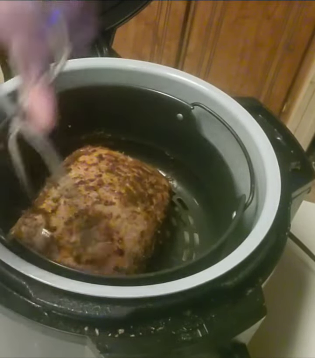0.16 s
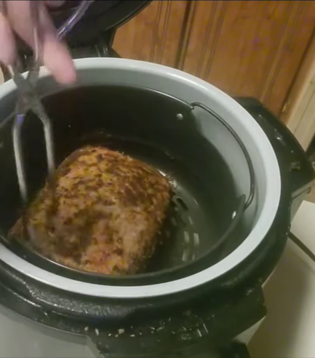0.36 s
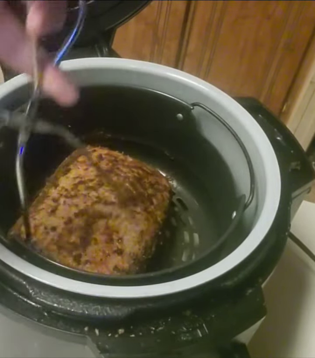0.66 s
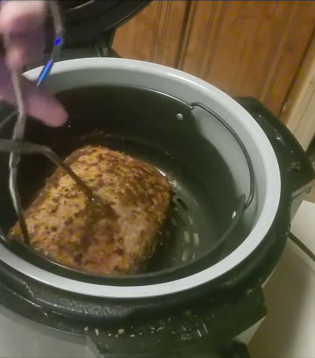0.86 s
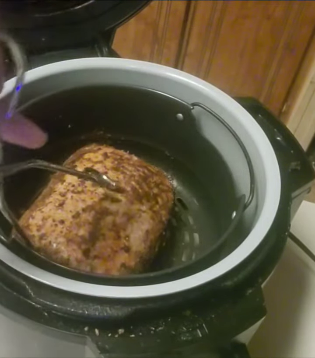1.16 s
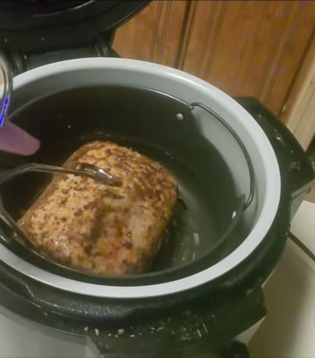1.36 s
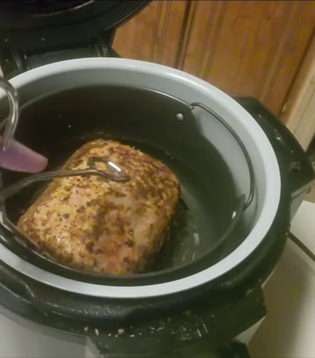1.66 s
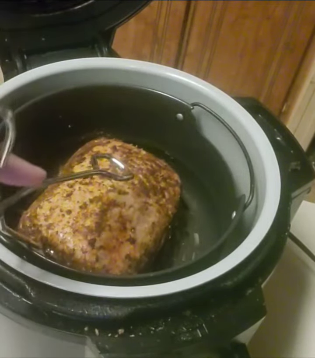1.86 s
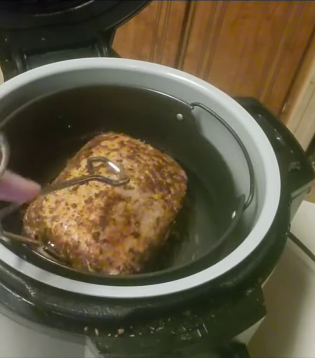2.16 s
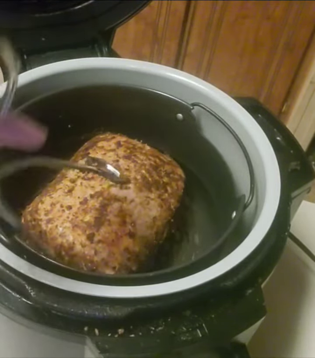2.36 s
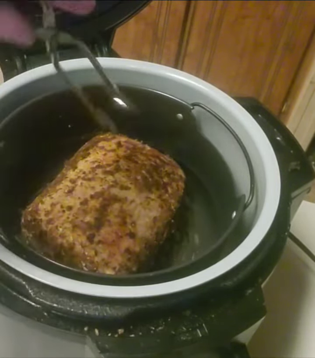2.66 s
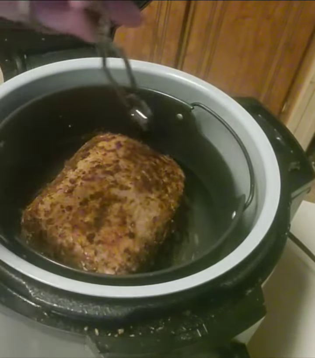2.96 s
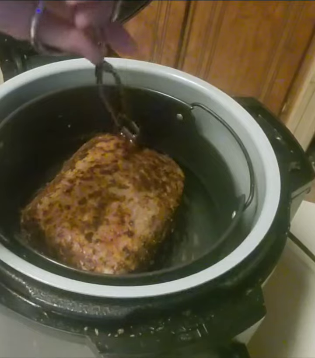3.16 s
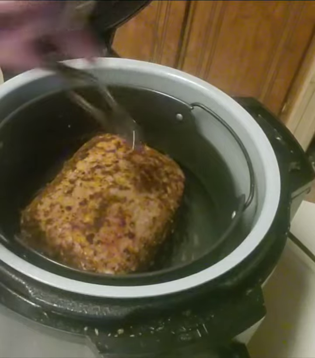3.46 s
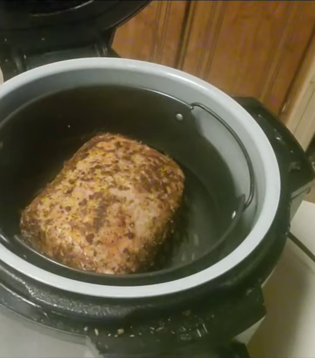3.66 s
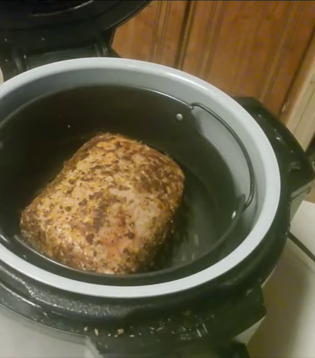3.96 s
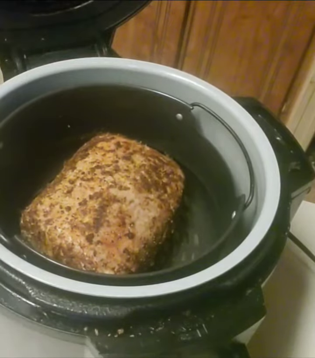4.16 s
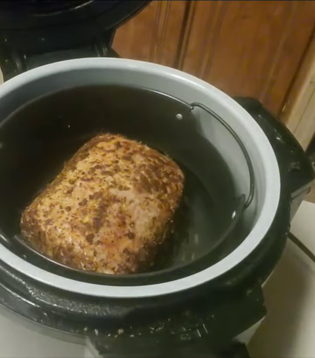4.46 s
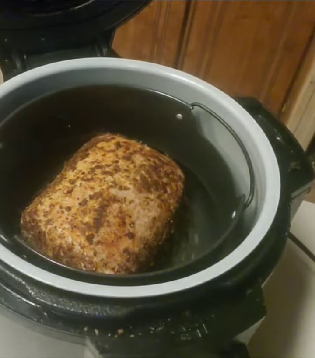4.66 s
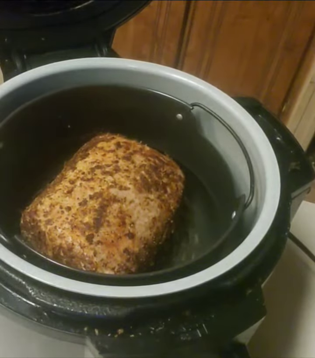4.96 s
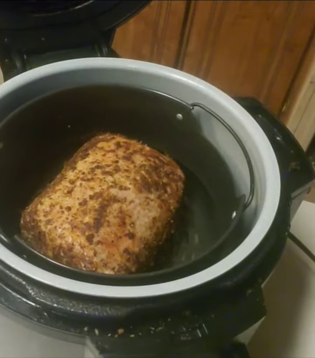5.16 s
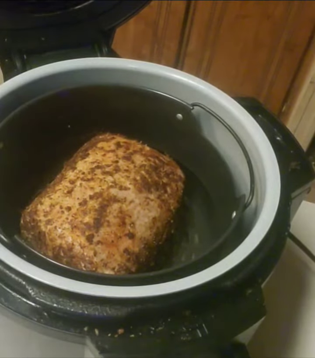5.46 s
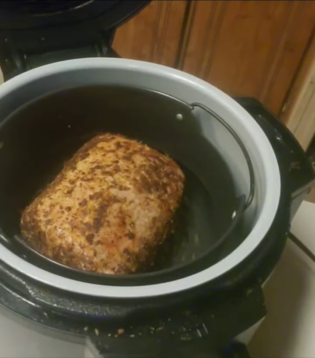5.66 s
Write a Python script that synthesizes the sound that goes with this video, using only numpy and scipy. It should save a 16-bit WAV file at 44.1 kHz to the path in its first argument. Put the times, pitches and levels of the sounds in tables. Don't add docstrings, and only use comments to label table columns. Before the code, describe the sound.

Steel tongs scrape, rattle and clink on a cooking basket over a low fan hum, then thud and clatter down on a counter.

```python
import sys
import numpy as np
from scipy import signal
from scipy.fft import rfft, irfft
from scipy.io import wavfile
from scipy.ndimage import uniform_filter1d

SR = 44100
rng = np.random.default_rng(int(sys.argv[2]) if len(sys.argv) > 2 else 0)


def invert_db(level):
    return 10 ** (np.asarray(level, dtype=float) / 20)


def store_pcm(level_fs):
    pcm = np.round(np.clip(level_fs, -1, 1) * 32767).astype(np.int16)
    wavfile.write(sys.argv[1], SR, np.atleast_2d(pcm).T)


N = 256662

# [t/s, peak level/dB, chatter length/ms, ring level/dB]
RIM_TAP_HITS = [
    (.074, -42.5, 16, -13),
    (.971, -48.5, 12, 0),
    (1.078, -39, 8, -23),
    (1.478, -57, 6.5, -15),
]
RATTLE_HITS = [(.4754, -46, 3, -8), (.5035, -40, 2, -8.5), (.5078, -27.5, 2, -8), (.5098, -25.5, 2, -8),
               (.5125, -30, 2, -9), (.5155, -31.5, 2, -8), (.5188, -29.5, 2, -5.5), (.5235, -30.5, 2, -7),
               (.5275, -30, 3.5, -7.5), (.533, -33.5, 2, -10), (.538, -32, 2, -9.5), (.547, -34, 3, -8),
               (.5535, -34, 2, -8), (.562, -36, 3, -9), (2.6505, -41, 5, -8.5), (2.6645, -36, 7, -9.5)]
RIM_CLINK_HITS = [
    (.6658, -17.5, 2.6, -28.5),
    (.6675, -7, 3.7, -13),
    (.696, -26, 5.5, -8.5),
    (.7035, -29, 5.4, -12),
]
WALL_TAP_HITS = [
    (1.194, -32.5, 6.6, 5.3),
    (1.2125, -47, 4.1, 4.4),
]
WALL_CLINK_HITS = [
    (2.686, -16, 6.35, -4.5),
]
THUD_HITS = [
    (4.4664, -14, 0.1, -1),
    (4.63, -45, 5.5, 3),
]
TIP_HITS = [
    (4.874, -27, 3, -7),
]
LAID_HITS = [
    (4.9729, -4.5, 1.3, -19.5),
    (4.9745, -5, 4, -12.5),
]
BOUNCE_HITS = [
    (4.9895, -18.5, 4.1, -16),
    (4.9928, -13, 8.6, -14),
    (5.0085, -26, 3, -11),
    (5.014, -20.5, 3.5, -14.5),
    (5.0225, -23.5, 9.8, -11),
    (5.0435, -27.5, 5.7, -10),
    (5.059, -24.5, 6.1, -13),
]
# [t/s, peak
# level/dB, left-right level/dB]
FAINT_TICKS = [(1.5595, -60, 7), (1.5791, -60, 2.5), (1.6887, -60, 4), (2.3046, -51.5, 8), (3.685, -57, -5),
               (4.0327, -62, -13), (4.1994, -59, -6), (4.4657, -42.5, -5), (5.5394, -77, -4.5),
               (5.5898, -74, -2.5)]

# [f/Hz, density level/dB per Hz]
RIM_TAP_COLOUR = [(180, -22), (300, -6), (701, -26), (870, -11), (1460, -11.5), (1690, -15.5), (2320, 1),
                  (2610, -15), (3290, 5.5), (4590, -15), (4990, -12), (12300, -14), (16000, -42)]
RATTLING_COLOUR = [(300, -26), (1200, -23.5), (2200, -11), (2700, -12), (3300, 2), (4100, -4.5),
                   (5000, -14), (6100, -7.5), (7500, -12), (12000, -19), (16000, -30.5)]
RIM_CLINK_COLOUR = [(70, -38), (150, -19), (340, -18.5), (700, -31), (1800, -12), (2600, -10), (3300, -1),
                    (4200, -9.5), (5300, -17.5), (6100, -4.5), (7500, -8.5), (8600, -19), (10400, -6),
                    (13000, -24.5), (14500, -44)]
LOW_WALL_COLOUR = [(290, -27), (500, -4), (613, -31), (893, -13), (1720, -21.5), (2070, -8), (2650, -40),
                   (3200, -13), (3810, -13), (11300, -32), (14700, -55), (16000, -71)]
WALL_CLINK_COLOUR = [(60, -35), (160, 2), (350, -8.5), (600, -26), (1800, -33.5), (2700, -18), (3500, -8),
                     (4400, -10.5), (5200, -23), (6100, -10.5), (8000, -17), (11600, -12.5), (13800, -23),
                     (15800, -43)]
COUNTER_COLOUR = [(35, -46.5), (70, -13), (175, -19), (300, 3.5), (470, -1), (700, -7.5), (1000, -9.5),
                  (2000, -7), (2800, -15), (3500, -18), (4300, -15), (6000, -18), (10000, -46),
                  (15800, -49)]
TIP_TOUCH_COLOUR = [(240, -33), (400, 2), (839, -18), (1040, -5), (1820, -10), (2510, -4.5), (2970, -9.5),
                    (5430, -19.5), (6640, -34), (8240, -32), (16000, -55)]
LANDING_COLOUR = [(60, -65), (120, -17.5), (550, -16), (1100, -4), (1700, 2), (2250, -2.5), (2700, -2),
                  (4000, -13), (5300, -14.5), (6200, -14), (7300, -23.5), (8800, -16), (11300, -35),
                  (15800, -31)]
BOUNCING_COLOUR = [(35, -24), (60, -2), (112, -3.5), (291, -10), (394, 1.5), (1020, -3.5), (1520, -14),
                   (1790, -3.5), (2710, -1), (6120, -14.5), (7540, -34), (11700, -27.5), (15500, -43)]
FAINT_TICK_COLOUR = [(2000, -24), (5000, 4), (9000, 10.5), (13000, 9), (16000, 1.5)]

# [f/Hz, level/dB, t60/s]
RIM_MODES = [(934, -6, 0.26), (1343, -7.5, .2), (2440, -5.5, 0.22), (3144, 0, .08), (2990, -1.5, 0.12),
             (3960, -8, .12), (4060, -9, .12), (5900, -10.5, .12), (5950, -9, 0.16), (6380, -2, 0.13),
             (7550, -23.5, .2), (9700, -18, 0.074), (10300, -11, 0.046)]
RATTLE_MODES = [(2200, -6, .04), (3300, 2.5, .04), (3330, -4, .05), (4280, -5, 0.069), (6100, -12.5, .03)]
STRUCK_RIM_MODES = [(333, -3, 0.19), (906, -11.5, .18), (1365, -11.5, .25), (2390, -10, 0.22),
                    (3220, 0.5, 0.075), (3338, -8, .14), (3517, -5, .06), (4264, -6, .1), (4888, -9, .09),
                    (5926, -4, .05), (6148, -15, .2), (6590, -3.5, 0.1), (7553, -15.5, .15),
                    (9860, -7, .06)]
LOW_WALL_MODES = [(294, -15, 0.087), (860, -12, 0.041), (1390, -14, 0.045), (2067, 0, 0.045),
                  (2346, -16, 0.089), (3217, 4.5, 0.028), (3600, -22, 0.08), (4800, -21, 0.04)]
WALL_MODES = [(168, -4.5, 0.17), (365.6, -6, 0.22), (924, -20.5, 0.45), (1410, -25, 0.21),
              (1870, -23, 0.26), (2400, -14, .12), (2750, -10, 0.15), (3037, -10, 0.22), (3374, -1, 0.092),
              (3640, 0.5, 0.075), (4250, -5, 0.088), (4840, -5.5, 0.085), (6050, -1.5, 0.052),
              (6557, 0, 0.054)]
COUNTER_MODES = [(70, -25, 0.22), (117, -11, 0.19), (310, -9.5, 0.1624), (423, -7, 0.084),
                 (516, -12, 0.065), (720, -5, 0.081), (986, 5, 0.077), (1388, -3.5, 0.045),
                 (1925, -7, 0.042), (2445, -7, 0.044), (4170, -18, 0.026)]
TIP_MODES = [(1080, -18, .05), (2370, -13, .04), (4000, -7, 0.038)]
TONG_MODES = [(118, -11.5, 0.33), (523, -8, 0.34), (1590, 1, .1), (1777, -2, .15), (2740, 2.5, .12),
              (2980, -5, .12), (3321, -10, .15), (3720, -5, .15), (4100, 0, 0.19), (4600, -8, .15),
              (5889, -9, .12), (6310, 2, .06), (8635, -22, .1), (11400, -14, 0.23)]
SETTLING_MODES = [(82.4, -1.5, 0.59), (427, -0.5, .2), (520.6, -4.5, 0.22), (1776, 2, 0.09), (2020, -6, .1),
                  (2726, -4, 0.071), (3050, -3.5, 0.1), (3374, -7, 0.072), (3500, -3.5, 0.12),
                  (5900, -15, .06)]

# [loudest t/s, rise/s, fall/s, level/dB, brightness/dB per octave]
SCRAPE_STROKES = [
    (.05, 0.11, 0.16, -57.5, 3.5),
    (.514, 0.08, 0.086, -42.5, -0.2),
    (.664, 0.11, 0.0051, -45.5, 0.8),
    (.974, 0.0073, 0.22, -60, 1),
    (1.085, 0.03, 0.047, -67, -7),
    (2.658, 0.013, 0.1, -48.5, -3),
]
# [f/Hz, density level/dB per Hz]
COATING_COLOUR = [(240, -35.5), (400, -11), (607, -23), (814, -18.5), (1140, -14), (1400, -2), (1680, -16),
                  (2020, -4.5), (2630, -12.5), (3160, -4), (4440, -16), (4650, -13.5), (7170, -19),
                  (7870, -18), (16000, -29)]
# [loudest t/s, rise/s, fall/s, level/dB]
SLEEVE_STROKES = [
    (.343, 0.019, 0.047, -72.5),
    (1.484, .013, 0.03, -62),
    (1.57, 0.14, 0.37, -75),
    (2.32, .13, 0.14, -66),
    (4.06, 0.17, 0.37, -68.5),
    (4.24, 0.17, 0.2, -65),
    (5.55, 0.083, .1, -70),
    (5.72, 0.11, 0.22, -71),
]
# [f/Hz, density level/dB per Hz]
SLEEVE_COLOUR = [(880, -47), (1500, -10.5), (1640, -2), (1900, -7), (2340, -3), (3030, -17), (3590, -6),
                 (4290, -8), (8830, -13.5), (16000, -24.5)]

# [f/Hz, t60/s]
ROOM_DECAY = [(100, 0.43), (400, 0.24), (1500, 0.28), (4000, .26), (9000, 0.22), (15000, 0.11)]
# [f/Hz, correlation/1]
PORT_LIKENESS = [(25, .6), (60, 0.88), (130, .93), (290, .9), (640, 0.56), (1400, 0.26), (3100, 0.21),
                 (6800, 0.18), (15000, 0.067)]
# [f/Hz, left-right level/dB]
FAN_TILT = [(60, -1), (110, -0.5), (200, -1.0), (380, -3), (700, -5.5), (1290, -2), (2380, 0), (4400, 2.5),
            (8120, -2), (15000, 1)]
# [f/Hz, density level/dB per Hz]
FAN_AIR = [(12, -53.5), (20, -23.5), (43, -10.5), (116, -5.5), (150, -4), (367, 0.5), (410, -6.5),
           (542, -11.5), (678, -13.5), (849, -14), (949, -17), (2750, -28), (3530, -31), (4540, -33),
           (16000, -47)]
# [f/Hz, width/Hz, level/dB]
DUCT_RESONANCES = [(305.7, 120, 1.5), (557, 24.2, 9), (790, 68, 8.5), (1134, 300, 6.5), (1667, 310, 6),
                   (2380, 210, 6.5), (3560, 710, 9.5), (7260, 590, -7.5)]
# [f/Hz, wavering width/Hz, level/dB]
MOTOR_LINES = [(59.2, 1.8, -73), (120.1, 6, -66.5), (272.8, 1.4, -67), (549.6, 2.3, -66.5),
               (829, 3.5, -65.5), (1150, 4.4, -80), (1260, 4.8, -79), (1410, 1.4, -74), (1535, 4, -84.5),
               (3700, 8, -87)]

FAN_LAG, BASKET_LAG, COUNTER_LAG = 13, 4, 13


def contact(s, db, ms, ring_db, colour, modes, room_db, pan_db, lag):
    longest_s = max(t60 for _, _, t60 in modes)
    t = np.arange(0, min(longest_s + .05, .4), 1 / SR)
    crack = signal.oaconvolve(chatter(ms), causal(colour))
    crack = np.pad(crack, (0, len(t)))[:len(t)]
    fill = 1 - np.exp(-t / (0.00042 * ms))
    ring = ringing(modes, t) * fill
    crack = -invert_db(db) * crack / abs(crack).max()
    ring = -invert_db(db + ring_db) * ring / abs(ring).max()
    return s, ports(crack + ring, pan_db, lag), invert_db(room_db) * (crack + 0.68 * ring)


def chatter(ms, size=2048):
    u = np.arange(size) / SR / (max(ms, .3) / 1000)
    swell = np.tanh(7.0 * u) * np.exp(-u ** 3)
    x = rng.standard_normal(size) * swell
    if ms < 1:
        return swell
    for _ in range(6):
        z = rfft(x)
        flat = irfft(z / (abs(z) + 1e-12))
        x = flat * swell / np.sqrt(uniform_filter1d(flat ** 2, 24) + 1e-9)
    return x


def ringing(modes, t):
    split_hz = 60.0 * rng.standard_normal(len(modes))
    phase = 2 * np.pi * rng.random(len(modes))
    total = np.zeros(len(t))
    for (hz, db, t60), split, p in zip(modes, split_hz, phase):
        twin_hz = hz + split * min(hz / 1000, 1)
        pair = np.sin(2 * np.pi * hz * t) + .5 * np.sin(2 * np.pi * twin_hz * t + p)
        total += invert_db(db - 60 * t / t60) * pair
    return total


def friction(row, colour, per_s, spread_db, ring_db):
    top_s, rise_s, fall_s, db, slope = (*row, 0)[:5]
    t = np.arange(-min(rise_s, top_s), fall_s, 1 / SR)
    rise_db = -28.5 * abs(t / rise_s) ** 0.8
    fall_db = -34.5 * abs(t / fall_s) ** 1.5
    level_db = db + np.where(t < 0, rise_db, fall_db)
    slips = rng.standard_normal(SR // 2) * (rng.random(SR // 2) < per_s / SR)
    slips = slips * invert_db(spread_db * np.minimum(rng.exponential(1, SR // 2), 4))
    tilted = [(hz, d + slope * np.log2(hz / 4000)) for hz, d in colour]
    rub = evened(signal.oaconvolve(slips, causal(tilted))[:len(t)])
    damped = [(hz, d, 0.67 * t60) for hz, d, t60 in RIM_MODES]
    rim = ringing(damped, np.arange(3000) / SR)
    ring = evened(signal.oaconvolve(slips, rim)[:len(t)])
    return top_s + t[0], (rub + invert_db(ring_db) * ring) * invert_db(level_db)


def ports(x, pan_db, lag, own=0.6, direct=0.45):
    taps = np.zeros((2, 400))
    at = rng.integers(20, 400, (2, 8)) // np.array([[1], [4]])
    size = rng.uniform(-1, 1, at.shape) * np.exp(-at / 150)
    size[1] *= np.sqrt(1 - direct ** 2) / (own * np.linalg.norm(size[1]))
    np.put_along_axis(taps, at, own * size, 1)
    taps[1, lag] = direct - 1
    taps = signal.lfilter([1, -1], [1, -.93], taps)
    taps[0, 0] += 1
    taps[1, lag] += 1
    return signal.oaconvolve(x[None], taps, axes=1) * invert_db(np.array([[.5], [-.5]]) * pan_db)


def kitchen(x):
    taps = np.zeros((2, SR // 2))
    at = np.arange(400, SR // 2 - 20, 20)
    at = at + rng.integers(0, 20, (2, len(at))) - 200
    np.put_along_axis(taps, at, rng.choice([-1., 1.], at.shape), 1)
    hz, t, z = signal.stft(taps, SR, nperseg=512)
    same = np.clip(read(PORT_LIKENESS, hz), 0, 1)[:, None]
    z = np.array([z[0], same * z[0] + np.sqrt(1 - same ** 2) * z[1]])
    decay = invert_db(-60 * t / read(ROOM_DECAY, hz)[:, None])
    tail = signal.istft(z * decay, SR, nperseg=512)[1]
    tail = tail / np.linalg.norm(tail, axis=1, keepdims=True)
    return signal.fftconvolve(x[None], tail, axes=1)[:, :N]


def fan():
    t = np.arange(N) / SR
    sound = fan_air()
    for f, width, db in MOTOR_LINES:
        sound += motor_line(t, f, width, db)
    settling_db = -4.5 / (1 + np.exp((t - .66) / 0.1))
    lift_db = 2.5 * np.exp(-((t - 4.85) / 0.3) ** 2)
    return sound * invert_db(settling_db + lift_db)


def fan_air():
    frames, hz = N // 512 + 5, np.fft.rfftfreq(2048, 1 / SR)
    a, b, c, d, patches = rng.standard_normal((frames, 1025, 5)).T
    patches = evened(uniform_filter1d(uniform_filter1d(patches, 20, 0), 8, 1))
    shape_db = read(FAN_AIR, hz)
    for f, width, db in DUCT_RESONANCES:
        shape_db = shape_db + db / (1 + (2 * (hz - f) / width) ** 2)
    same = np.clip(read(PORT_LIKENESS, hz), -1, 1)[:, None]
    left = a + 1j * b
    z = np.array([left, same * left + np.sqrt(1 - same ** 2) * (c + 1j * d)])
    z[1] *= np.exp(-2j * np.pi * hz * FAN_LAG / SR)[:, None]
    balance_db = np.array([.5, -.5])[:, None, None] * read(FAN_TILT, hz)[:, None]
    z *= invert_db(shape_db[:, None] + 2.1 * patches + balance_db)
    return invert_db(-52) * evened(signal.istft(z, nperseg=2048, noverlap=1536)[1][:, :N])


def motor_line(t, f, width, db):
    knots = np.arange(0, N / SR + 1, 1 / (2 * width + 1))
    wander = rng.standard_normal((2, 2, len(knots)))
    same = read(PORT_LIKENESS, f)
    wander[1] = same * wander[0] + (1 - same) * wander[1]
    turn = np.exp(2j * np.pi * f * t)
    line = np.zeros((2, N))
    for port in range(2):
        real, imag = (np.interp(t, knots, w) for w in wander[port])
        swing = 1 + 0.72 * (real + 1j * imag)
        late = np.exp(-2j * np.pi * f * port * FAN_LAG / SR)
        line[port] = invert_db(db) * np.sqrt(2) * (swing * turn * late).real
    return line


def evened(x):
    return x / np.sqrt(np.mean(x ** 2) + 1e-20)


def read(points, hz):
    f, value = np.transpose(points)
    return np.interp(np.log(hz + 1), np.log(f + 1), value)


def add(mix, s, sound):
    part = mix[..., round(s * SR):][..., :sound.shape[-1]]
    part += sound[..., :part.shape[-1]]


def causal(points, size=4096):
    hz = np.fft.rfftfreq(size, 1 / SR)
    log_gain = np.log(invert_db(np.maximum(read(points, hz), -80)))
    full = np.concatenate([log_gain, log_gain[-2:0:-1]])
    taps = np.fft.ifft(np.exp(np.conj(signal.hilbert(full)))).real[:size // 2]
    return taps / np.linalg.norm(taps)


def scene():
    # (contacts, colour, modes, room level/dB, left-right level/dB, lag/samples)
    bodies = [(RIM_TAP_HITS, RIM_TAP_COLOUR, RIM_MODES, -4, .6, BASKET_LAG),
              (RATTLE_HITS, RATTLING_COLOUR, RATTLE_MODES, -7, -3, BASKET_LAG),
              (RIM_CLINK_HITS, RIM_CLINK_COLOUR, STRUCK_RIM_MODES, -9, -2.5, BASKET_LAG),
              (WALL_TAP_HITS, LOW_WALL_COLOUR, LOW_WALL_MODES, -8, -3, BASKET_LAG),
              (WALL_CLINK_HITS, WALL_CLINK_COLOUR, WALL_MODES, -8.5, -1.2, BASKET_LAG),
              (THUD_HITS, COUNTER_COLOUR, COUNTER_MODES, -3, -3.4, COUNTER_LAG),
              (TIP_HITS, TIP_TOUCH_COLOUR, TIP_MODES, -1.5, -4, COUNTER_LAG),
              (LAID_HITS, LANDING_COLOUR, TONG_MODES, -5.5, -1.8, COUNTER_LAG),
              (BOUNCE_HITS, BOUNCING_COLOUR, SETTLING_MODES, -7, -3.5, COUNTER_LAG)]
    hits = [contact(*row, *body) for rows, *body in bodies for row in rows]
    for s, db, pan_db in FAINT_TICKS:
        hits.append(contact(s, db, 3, -24, FAINT_TICK_COLOUR, RIM_MODES, -1, pan_db, BASKET_LAG))
    near, far = np.zeros((2, N)), np.zeros(N)
    for s, direct, wet in hits:
        add(near, s, direct)
        add(far, s, wet)
    # (strokes, colour, slips per second, spread/dB, rim ring level/dB)
    rubs = [(SCRAPE_STROKES, COATING_COLOUR, 3000, 3.5, -6),
            (SLEEVE_STROKES, SLEEVE_COLOUR, 12000, 1.5, -40)]
    for strokes, *surface in rubs:
        for row in strokes:
            s, rub = friction(row, *surface)
            add(near, s, ports(rub, -1.3, BASKET_LAG) * invert_db(0.5))
            add(far, s, rub * invert_db(-3.0))
    b, a = signal.butter(2, 55, "high", fs=SR)
    return signal.lfilter(b, a, near + kitchen(far) * invert_db([[.9], [-.9]])) + fan()


def roll_off(x):
    return signal.sosfilt(signal.butter(12, 16500, fs=SR, output="sos"), x)


def record(dry):
    edge = signal.firwin(401, 15850, window=("kaiser", 8), fs=SR)
    mix = signal.oaconvolve(dry, edge[None], "same")
    return roll_off(mix)


dry = scene()
out = record(dry)
store_pcm(out)
```